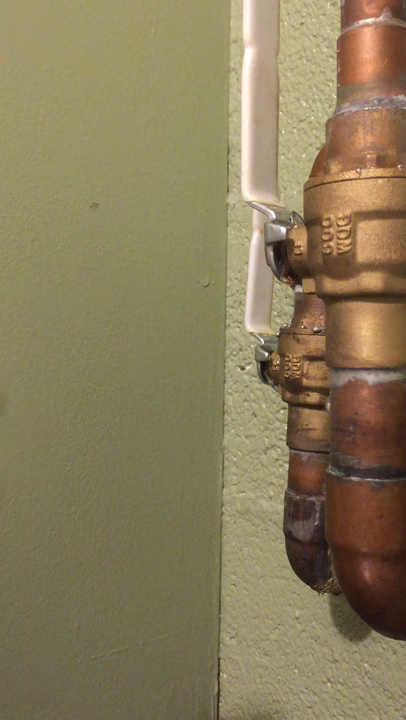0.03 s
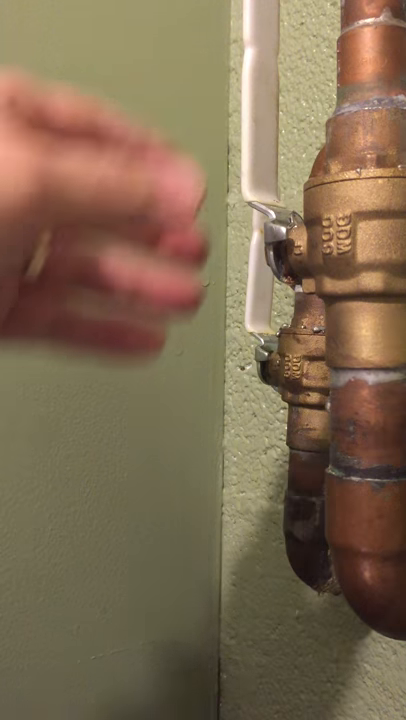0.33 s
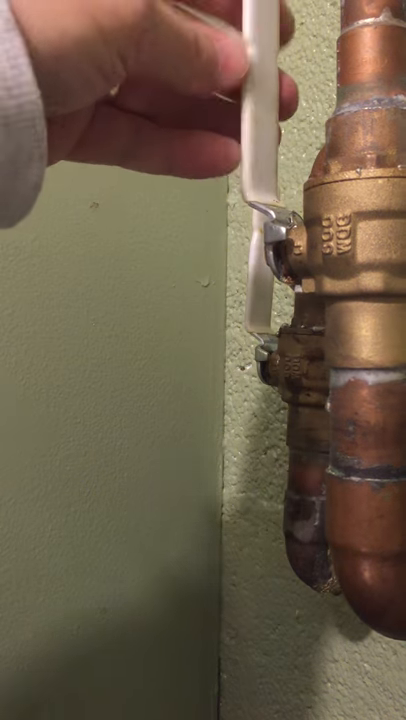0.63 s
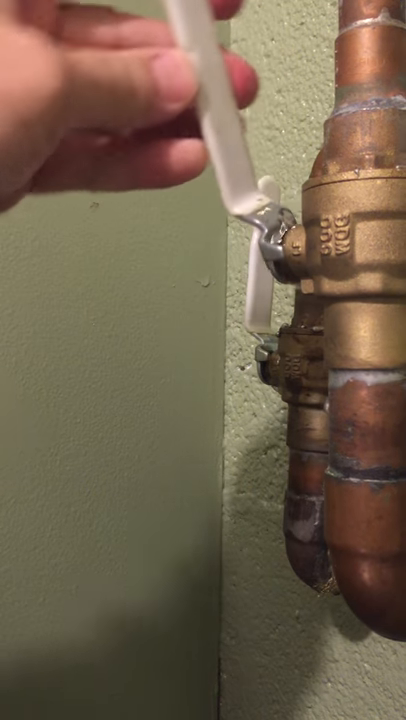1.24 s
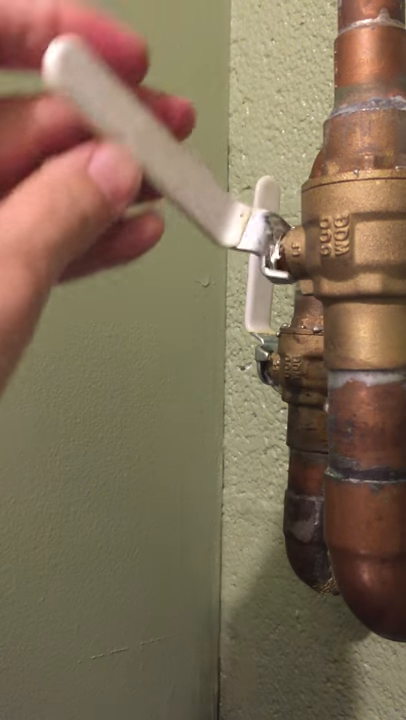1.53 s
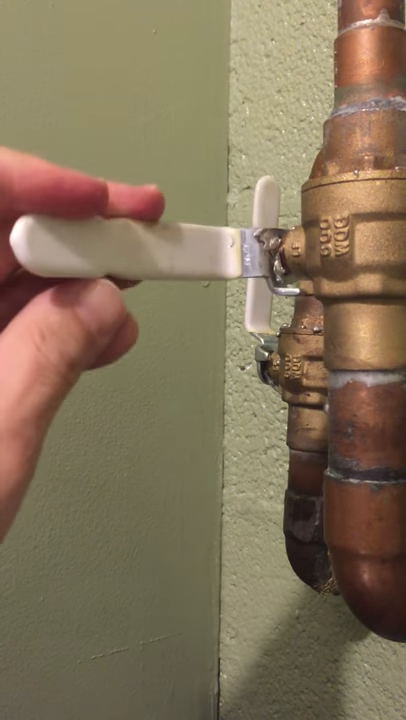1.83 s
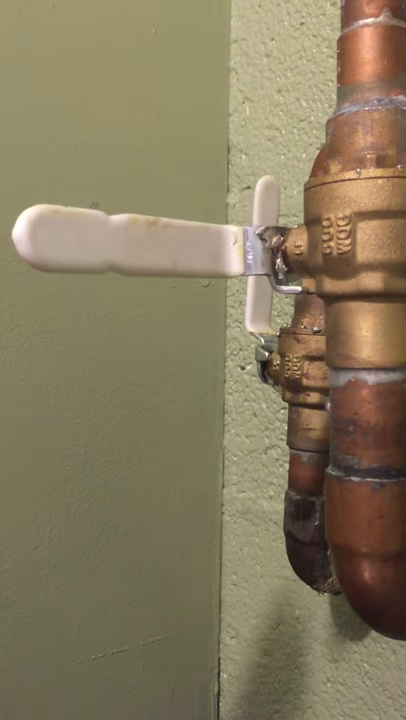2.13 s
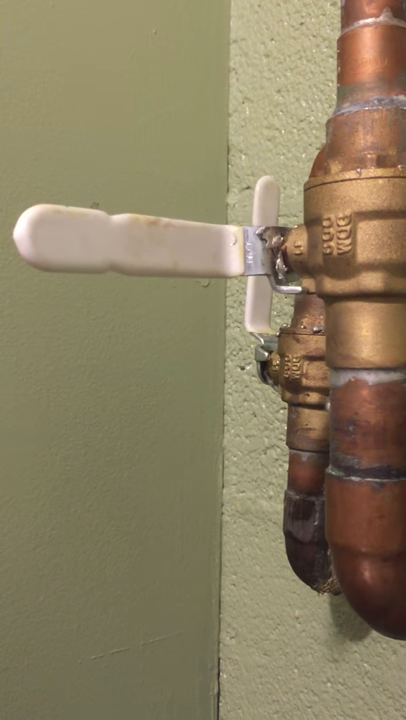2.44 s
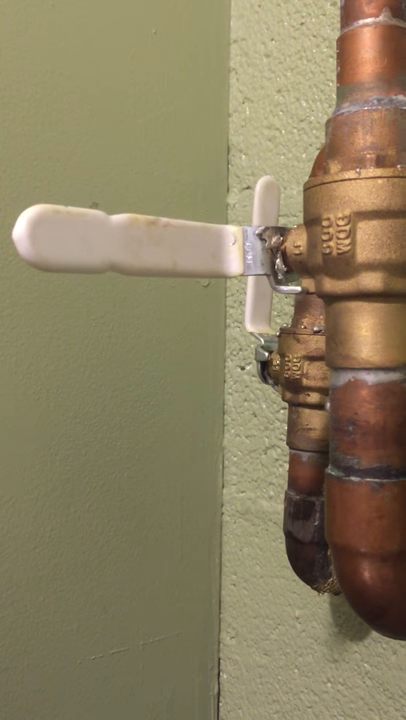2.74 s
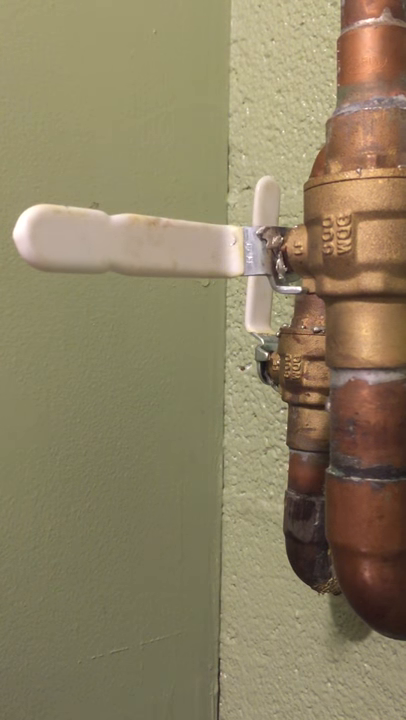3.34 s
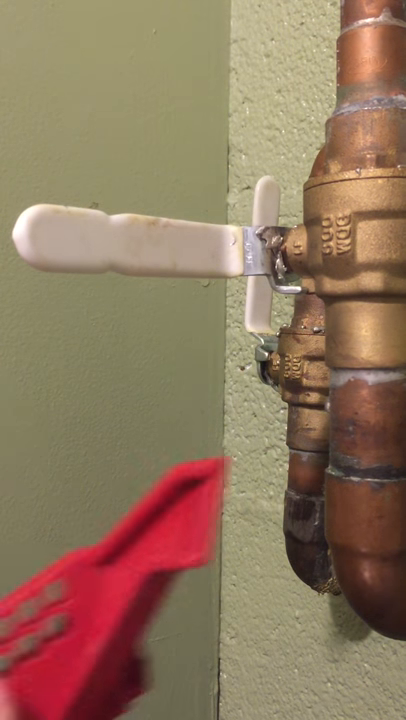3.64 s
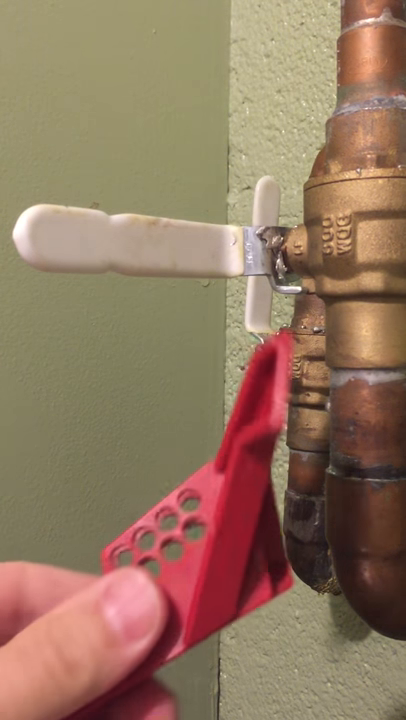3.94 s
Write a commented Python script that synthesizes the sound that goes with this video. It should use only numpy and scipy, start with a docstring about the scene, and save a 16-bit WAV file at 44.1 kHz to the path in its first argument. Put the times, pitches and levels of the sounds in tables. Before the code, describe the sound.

In a small room, a valve handle turns close to the microphone, knocking the pipe softly before a ringing metal click and short scrape. Light handling follows, then a loud, sharp clack from a plastic device.

```python
"""A steel lever on a brass ball valve is swung a quarter turn in a small, hard-walled room.
The lever clicks, grates against its stop and pings when let go. As the ball turns, the valve
stem ticks and the copper pipe thuds and rings. Then a plastic device is picked up and snaps
with a loud clack. Each of these sounds is a short burst of tiny impacts, filtered or left to ring.
Hands bump softly now and then; mains hum and faint air noise lie underneath."""
import sys
import numpy as np
from scipy import signal
from scipy.fft import rfft, irfft
from scipy.io import wavfile

SR = 44100
rng = np.random.default_rng(int(sys.argv[2]) if len(sys.argv) > 2 else 0)


def store_wav(level_fs):
    """Save 16-bit WAV to argv[1]."""
    pcm = np.round(np.clip(np.atleast_2d(level_fs), -1, 1) * 32767)
    wavfile.write(sys.argv[1], SR, pcm.T.astype(np.int16))


N = 176400  # 4 seconds
EVENT_TIME_S = np.arange(SR * 2 // 5) / SR  # each short sound gets 0.4 seconds
FILTER_HZ = np.fft.rfftfreq(8192, 1 / SR)  # the pitches at which a filter's gain is set


# Each slip of the lever against its stop: start_s, length_s, scrape_db, ring_db
LEVER_SLIPS = [(2.068, 0.013, -27.5, -40), (2.0753, 0.021, -18, -23.5), (2.0972, 0.0054, -14.5, -14),
               (2.1015, 0.012, -10.5, -13), (2.185, .003, -31.5, -42), (2.206, 0.0018, -37, -39)]
# The tone of steel sliding on brass: pitch_hz, level_db
SCRAPE_TONE = [(200, -51), (700, -5), (1200, 5), (2200, -4), (4000, -0.5), (7500, -1.5), (9900, 2.5),
               (10600, -5.5), (12000, -1), (13200, -8), (16500, -8)]
# The notes the lever rings with (fade_s is the time to drop 60 dB): pitch_hz, level_db, fade_s
LEVER_NOTES = [(2820, -3.5, 0.086), (3520, 3.5, 0.14), (3640, -7, 0.13), (4860, -21, .14),
               (6230, -12, 0.09), (7400, 1, 0.096), (8456, -3.5, 0.15), (8640, -7, 0.092),
               (9800, -13, 0.14), (9805, 0, 0.2), (12100, -15, 0.17), (14230, -10, .09), (14830, -11, .12),
               (16320, 0, 0.086)]

def lever_grate():
    """Steel slips on brass in little jerks; each one scrapes and makes the lever ring."""
    out = np.zeros(N)
    for start_s, length_s, scrape_db, ring_db in LEVER_SLIPS:
        force = contact(length_s)
        scrape = room(shape_tone(force, read_curve(SCRAPE_TONE, FILTER_HZ)), echo_db=-3.5)
        add(out, start_s, amp(scrape_db) * scrape + amp(ring_db) * ring(force, LEVER_NOTES))
    return out


# The lever's one click: start_s, length_s, level_db
LEVER_CLICK = (1.918, 0.0014, -19)
# The tone of that click: pitch_hz, level_db
CLICK_TONE = [(500, -17), (2000, -11), (3400, -17), (4400, 3), (5500, -4), (6700, 1), (8500, -4),
              (10500, -3), (13000, -14), (17000, -18)]
# The notes that ring after it: pitch_hz, level_db, fade_s
CLICK_NOTES = [(2374, -5, 0.17), (4560, -8, 0.26), (4600, 5, 0.14), (5900, -7, .13), (6900, -19, .12)]

def lever_click(ring_db=-28):
    """The slightly loose lever snaps across its slack and rings briefly."""
    out = np.zeros(N)
    start_s, length_s, level_db = LEVER_CLICK
    force = contact(length_s)
    click = room(shape_tone(force, read_curve(CLICK_TONE, FILTER_HZ)), echo_db=-8.5)
    add(out, start_s, amp(level_db) * click + amp(ring_db) * ring(force, CLICK_NOTES))
    return out


# The fingers leaving the lever: start_s, length_s, level_db
LEVER_RELEASE = (2.391, .025, -34.5)
# The notes of the lever when nothing holds it: pitch_hz, level_db, fade_s
FREE_LEVER_NOTES = [(1733, -6, 0.14), (3470, -0.5, 0.42), (8414, -7, 0.16), (9798, -4, 0.26),
                    (15900, -20, .09)]

def lever_ping():
    """The fingers let go and the steel rings freely."""
    out = np.zeros(N)
    start_s, length_s, level_db = LEVER_RELEASE
    add(out, start_s, amp(level_db) * ring(contact(length_s), FREE_LEVER_NOTES))
    return out


# Each catch of the stem, the rod that joins lever and ball: start_s, length_s, level_db
STEM_CATCHES = [(1.262, .003, -48), (1.296, .004, -46), (1.3835, .003, -33.5), (2.297, .005, -36)]
# The stem's short, high notes: pitch_hz, level_db, fade_s
STEM_NOTES = [(3720, -1, 0.026), (5750, -7, 0.0094), (6250, -0.5, 0.013), (7560, 0, 0.0068),
              (8560, -9, .02), (9700, -3, 0.1), (11900, -10, 0.042), (13300, -9, .005), (16000, -8, .008)]

def stem_ticks():
    """The turning stem catches in its seal and gives small, dry ticks."""
    out = np.zeros(N)
    for start_s, length_s, level_db in STEM_CATCHES:
        add(out, start_s, amp(level_db) * ring(contact(length_s), STEM_NOTES))
    return out


# Jolts from the turning ball and the stop: start_s, length_s, level_db, pitch_hz, width_octaves
PIPE_JOLTS = [(1.216, .01, -28, 157, 0.3), (1.306, 0.011, -27, 400, 0.82), (1.328, 0.011, -18.5, 132, 1),
              (1.332, 0.037, -26, 500, 0.62), (1.355, 0.0098, -26.5, 880, 0.16),
              (1.365, 0.017, -14.5, 230, 0.74), (1.38, 0.0064, -16, 118, 0.83),
              (1.42, 0.019, -26, 225, 0.25), (1.452, 0.011, -26, 229, 0.19),
              (1.919, 0.0035, -18, 1130, 0.65), (1.93, 0.016, -21.5, 227, 0.57),
              (1.957, 0.017, -29.5, 890, 0.88), (1.967, 0.01, -21.5, 152, 0.58),
              (1.988, 0.0067, -21.5, 76.5, 0.3), (2.065, 0.011, -20, 76, 0.42),
              (2.084, 0.0083, -19, 800, 0.33), (2.103, 0.011, -11, 735, 0.13),
              (2.103, 0.009, -17, 78.4, 0.58), (2.117, .03, -20, 213, 0.23),
              (2.189, 0.0085, -22.5, 890, 0.88), (2.195, 0.0086, -11, 676, 0.65),
              (2.204, 0.015, -16, 250, 0.88), (2.226, .025, -21.5, 666, .6),
              (2.245, 0.019, -16.5, 165, 0.72), (2.292, .02, -26.5, 220, 0.54),
              (2.37, 0.018, -29.5, 212, .5), (2.425, 0.0086, -22, 118, 0.54)]
# The notes of the copper pipe: pitch_hz, level_db, fade_s
PIPE_NOTES = [(77.1, 8.5, .35), (125.2, 1.5, 0.31), (173.2, -2.5, 0.46), (216, -2.5, 0.62),
              (232.3, 1.5, 0.21), (294, -3.5, 0.31), (470.5, 0.5, 0.34), (621, -1.5, 0.32), (719, 0, 0.086),
              (781, -2, 0.21), (864, 1.5, .2), (959, -2, 0.096), (1182, -4, 0.18), (1514, -7.5, 0.18)]

def pipe_thuds(ring_db=-1.5, knock_db=-6):
    """Each jolt gives a dull knock and rings the pipe's notes near its own pitch."""
    out = np.zeros(N)
    for start_s, length_s, level_db, pitch_hz, width_octaves in PIPE_JOLTS:
        force = contact(length_s)
        notes = [(hz, db + hump(hz, pitch_hz, width_octaves), fade_s) for hz, db, fade_s in PIPE_NOTES]
        knock = room(shape_tone(force, hump(FILTER_HZ, pitch_hz, width_octaves)), echo_db=3)
        thud = amp(ring_db) * ring(force, notes) + amp(knock_db) * knock
        add(out, start_s, amp(level_db) * thud)
    return out


# A faint lead-in tone (first row), then the plastic's hits:
# start_s, length_s, shell_db, tilt_db_per_octave, short_notes_db
CLACK_PARTS = [(2.951, 0.0068, -24.5, -2, -15.5), (2.9576, 0.00066, -3.5, 4.5, -9),
               (2.9592, 0.00083, -5, 0.5, -5), (2.9616, 0.0053, -3.5, 1.5, -28.5),
               (2.973, 0.00052, -10, -2.5, -22), (2.9768, 0.0014, -9, -0.5, -11),
               (2.980, 0.0034, -8, -4, -21.5)]
# The tone of the hollow plastic shell: pitch_hz, level_db
SHELL_TONE = [(50, -23), (110, -5.5), (220, -9.5), (320, -6), (480, -8), (1000, -4.5), (1800, -8),
              (2300, 1.5), (2700, -2.5), (3300, -3.5), (4000, -2), (5300, -2.5), (5950, -4.5), (6400, -8),
              (7000, -7.5), (9000, -24.5), (12000, -31), (16500, -50.5)]
# The notes the shell rings with: pitch_hz, level_db, fade_s
SHELL_NOTES = [(295.5, -1.5, .25), (348.8, -1, 0.24), (602, -6.5, .22), (1509, -9.5, 0.23),
               (2183, -8.5, 0.22), (2256, -0.5, 0.15), (2336, 1, 0.2), (2397, -6, .22), (2460, -2, 0.32),
               (2748, -6, 0.19), (2970, -17, .17), (3386, 0, 0.19), (3700, -4.5, 0.23), (3540, -7, .24),
               (3766, -4, .16), (4326, -3, .15)]
# Very short notes, used for the lead-in tone and for the stiff latch: pitch_hz, level_db, fade_s
SHORT_NOTES = [(3050, 0.5, 0.01), (3470, -1, 0.0073)]

def plastic_clack(tilt_hz=3000, ring_db=-5):
    """A faint, brief 3 kHz tone leads into the clack; then the plastic snaps, bounces and rings."""
    out = np.zeros(N)
    for start_s, length_s, shell_db, tilt_db_per_octave, short_notes_db in CLACK_PARTS:
        force = contact(length_s)
        tilt_db = tilt_db_per_octave * np.log2(0.5 + FILTER_HZ / tilt_hz)  # an upward tilt is brighter
        burst = shape_tone(force, read_curve(SHELL_TONE, FILTER_HZ) + tilt_db)
        shell = room(burst, echo_db=-2.5) + amp(ring_db) * ring(force, SHELL_NOTES)
        add(out, start_s, amp(shell_db) * shell + amp(short_notes_db) * ring(force, SHORT_NOTES))
    return out


# Each touch of a hand: start_s, length_s, level_db, pitch_hz, width_octaves
HAND_TOUCHES = [(0.318, .006, -43, 65.4, .4), (0.699, 0.0048, -23.5, 60, 0.42),
                (2.792, 0.013, -27.5, 74, 0.2), (2.821, 0.0014, -24.5, 1200, 0.39),
                (2.84, 0.0055, -36.5, 75, 0.42), (2.877, .03, -33.5, 3700, 0.42),
                (2.882, 0.0046, -28, 1500, 0.16), (2.904, 0.016, -20, 500, 0.79),
                (2.909, .03, -24.5, 1900, .6), (3.742, .01, -39, 61.6, 0.42)]

def hand_bumps():
    """Hands tap and rub the things they hold, too softly to make them ring."""
    out = np.zeros(N)
    for start_s, length_s, level_db, pitch_hz, width_octaves in HAND_TOUCHES:
        bump = shape_tone(contact(length_s), hump(FILTER_HZ, pitch_hz, width_octaves))
        add(out, start_s, amp(level_db) * room(bump, echo_db=1.5))
    return out


# How long the room's echo takes to drop 60 dB: pitch_hz, fade_s
ROOM_FADES = [(80, 0.26), (300, 0.32), (1000, 0.18), (2700, 0.26), (5000, 0.17), (9000, 0.17),
              (16000, 0.16)]

def room(sound, echo_db, gap_s=0.001, build_s=0.0056):
    """Nearby walls add a dense echo that lasts longest in the low notes; the result has energy 1."""
    hz, time_s, spectrum = signal.stft(rng.standard_normal(len(EVENT_TIME_S)), SR, nperseg=256)
    fade = amp(-60 * time_s / read_curve(ROOM_FADES, hz)[:, None])
    tail = signal.istft(spectrum * fade, SR, nperseg=256)[1][:len(EVENT_TIME_S)]
    tail *= np.clip((EVENT_TIME_S - gap_s) / build_s, 0, 1)
    echo = unit(signal.fftconvolve(sound, tail)[:len(sound)])
    return unit(sound + amp(echo_db) * echo)


# The tone of the air noise, mostly a low rumble: pitch_hz, level_db
AIR_TONE = [(20, -31), (31, -17.5), (42, -1.5), (60, 1), (90, -7), (150, -15), (250, -13.5), (350, -19),
            (550, -18.5), (760, -21.5), (1150, -19), (1500, -22), (2500, -26), (4000, -29), (6000, -31),
            (9000, -33), (10500, -37), (12000, -35.5), (17000, -39)]
# The notes in the mains hum: pitch_hz, level_db
HUM_NOTES = [(60, -82), (120, -75.5), (240, -79.5), (360, -82.5), (480, -77), (600, -77.5), (720, -83.5),
             (840, -82), (960, -82), (1080, -81), (1200, -80), (2283, -91), (2640, -87.5)]

def air_and_hum(start_s=0.083, air_db=-64.5, waver_hz=4, waver_depth=0.22):
    """Steady air noise and a mains hum whose notes each waver a little in loudness."""
    time_s, hz = np.arange(N) / SR, np.fft.rfftfreq(N, 1 / SR)
    out = amp(air_db) * noise(amp(read_curve(AIR_TONE, hz)))
    slow_only = np.exp(-(hz / waver_hz) ** 2)
    for pitch_hz, level_db in HUM_NOTES:
        waver = 1 + waver_depth * noise(slow_only)
        note = np.sqrt(2) * np.sin(2 * np.pi * (pitch_hz * time_s + rng.random()))
        out += amp(level_db) * waver * note
    return out * (time_s > start_s)


def contact(length_s, uneven_db=3.0, rise_share=0.25):
    """The force of two things touching: a short crowd of tiny impacts of uneven size."""
    count = len(EVENT_TIME_S)
    sizes = amp(uneven_db * np.minimum(rng.exponential(1, count), 4))
    impacts = sizes * rng.choice([-1, 1], count)
    rise = np.minimum(EVENT_TIME_S / (rise_share * length_s), 1)
    fall = np.exp(-np.minimum(EVENT_TIME_S / length_s, 10) ** 2)
    return unit(impacts * rise * fall)


def ring(force, notes):
    """A struck object rings with fading notes; their levels set only the balance between them."""
    out = 0
    for index, (pitch_hz, level_db, fade_s) in enumerate(notes):
        decay = 1000 ** (-1 / (fade_s * SR))
        angle = 2 * np.pi * pitch_hz / SR
        note = signal.lfilter([1, -1], [1, -2 * decay * np.cos(angle), decay * decay], force + 1e-20)
        out = out + (-1) ** index * amp(level_db) * unit(note)  # every other note is upside down
    return unit(out)


def shape_tone(sound, gain_db):
    """Filters a sound by one gain for each of FILTER_HZ, then scales it to energy 1."""
    cepstrum = irfft(np.log(amp(np.maximum(gain_db, gain_db.max() - 80))))
    half = len(cepstrum) // 2
    # Folding the second half onto the first keeps the filter from sounding early.
    cepstrum[1:half] *= 2
    cepstrum[half + 1:] = 0
    response = irfft(np.exp(rfft(cepstrum)))[:half]
    return unit(signal.fftconvolve(sound, response)[:len(sound)])


def noise(gains):
    """Noise for the whole scene, shaped by one gain per pitch, with average power 1."""
    return np.sqrt(N) * unit(irfft(rfft(rng.standard_normal(N)) * gains, N))


def hump(hz, centre_hz, width_octaves):
    """A gain in decibels that peaks at one pitch and falls away on both sides."""
    return -10 * np.log10(np.e) * (np.log2((hz + 1) / centre_hz) / width_octaves) ** 2


def read_curve(points, hz):
    """Reads between a table's rows, with pitch spaced in octaves."""
    pitches_hz, values = np.transpose(points)
    return np.interp(np.log(hz + 1), np.log(pitches_hz), values)


def amp(db):
    """Turns decibels into a gain."""
    return 10 ** (np.asarray(db) / 20)


def unit(sound):
    """Scales a sound to energy 1."""
    return sound / np.sqrt(np.sum(sound ** 2) + 1e-30)


def add(mix, start_s, sound):
    """Mixes a sound in at its start time."""
    part = mix[round(start_s * SR):][:len(sound)]
    part += sound[:len(part)]


def scene():
    """Adds the valve, the plastic device and the hands to the background, in one channel."""
    background = air_and_hum()
    valve = lever_grate() + lever_click() + lever_ping() + stem_ticks() + pipe_thuds()
    return (background + valve + hand_bumps() + plastic_clack())[None]


def record(dry, cutoff_hz=17200):
    """Cuts away the very highest treble."""
    low_pass = signal.firwin(511, cutoff_hz, window=("kaiser", 9), fs=SR)
    return signal.oaconvolve(dry, low_pass[None], "same")


dry = scene()
out = record(dry)
store_wav(out)
```